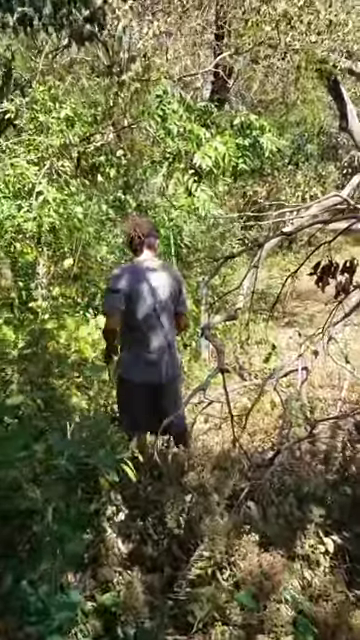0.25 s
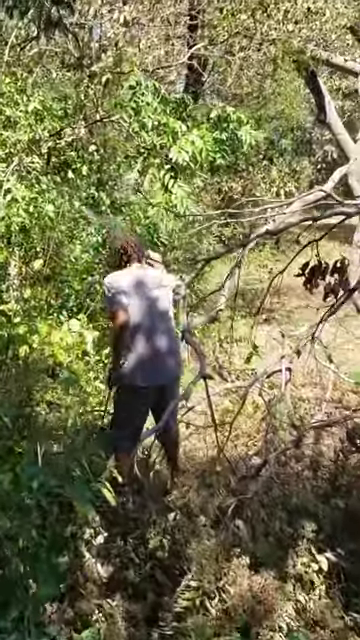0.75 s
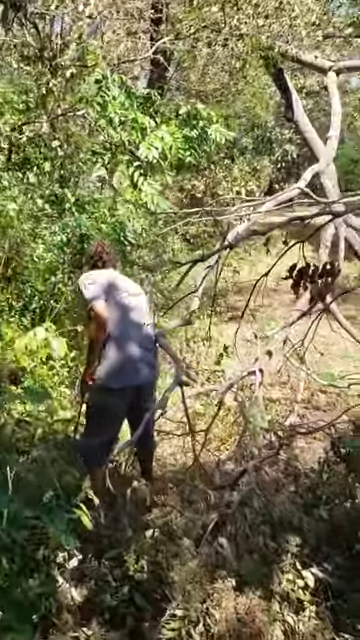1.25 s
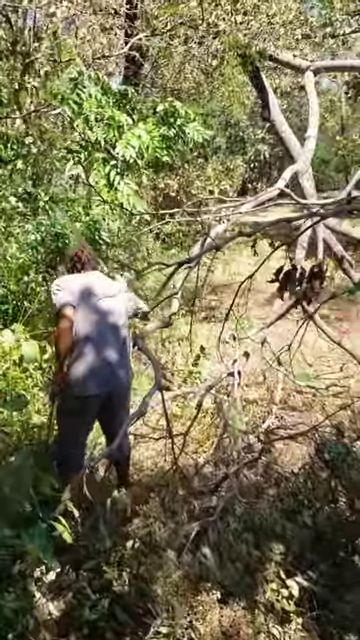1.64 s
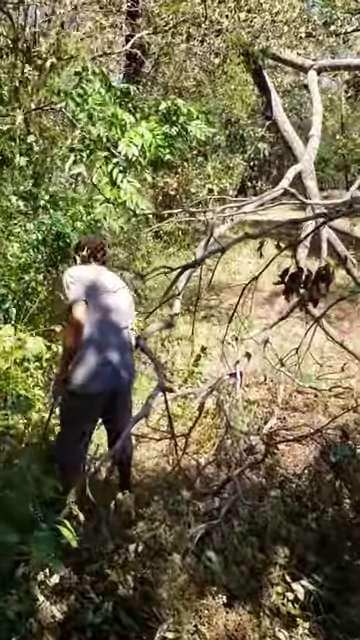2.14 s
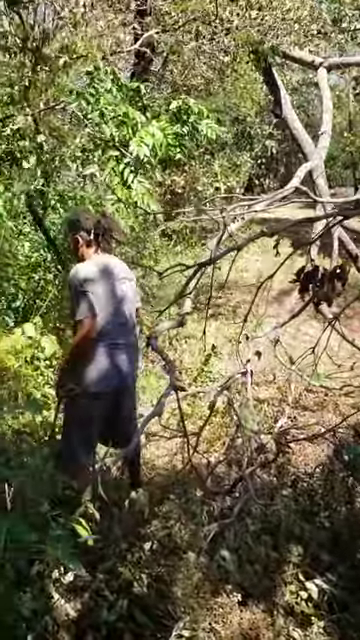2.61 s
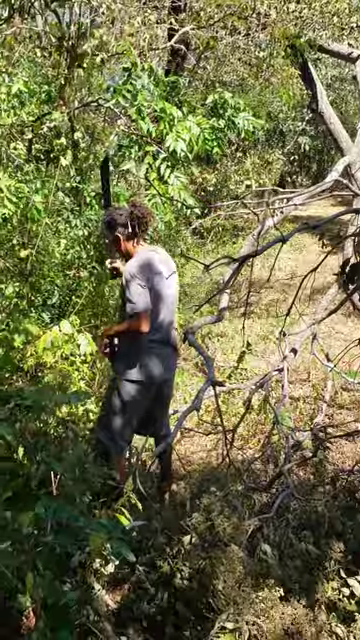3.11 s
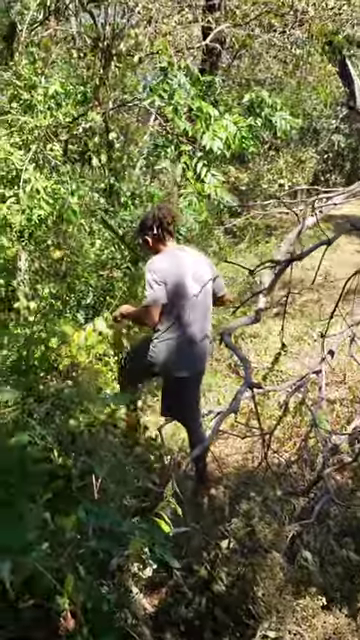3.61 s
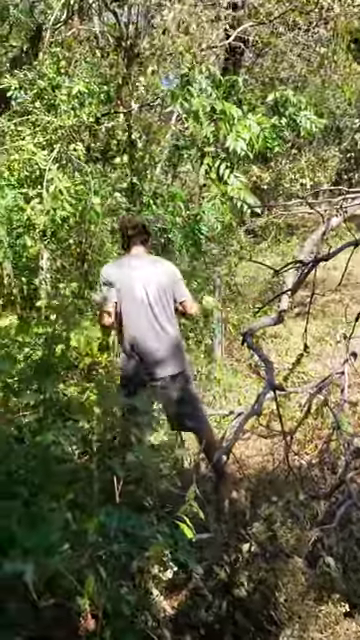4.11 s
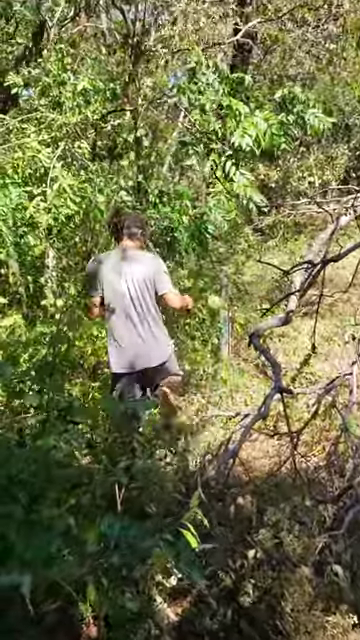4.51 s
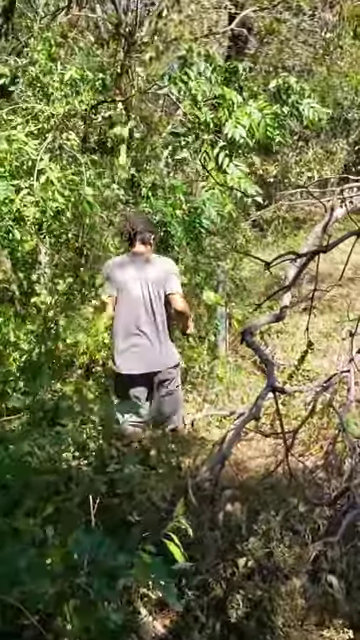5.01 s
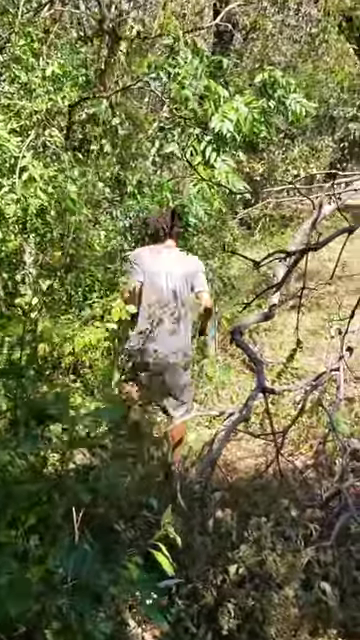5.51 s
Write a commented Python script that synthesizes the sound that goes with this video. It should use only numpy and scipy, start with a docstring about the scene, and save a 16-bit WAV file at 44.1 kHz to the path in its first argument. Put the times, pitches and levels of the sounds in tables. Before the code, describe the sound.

Dry leaves crackle and twigs snap underfoot while a long blade chops brush twice, ringing metallically after the second blow.

```python
"""On dry brushland, someone clears a way with a long blade, heard by a walker following on two ports.
Leaves crackle underfoot and around the cutter: noise gated by random cracks, over swells for each step.
Twigs snap as short noise pulses with a decaying ring; two chops thrash the bush and ring the blade's modes.
Sound from below reaches the right port well before the left; wind thumps are low tones on single ports."""
import sys
import numpy as np
from scipy import signal
from scipy.fft import rfft, irfft, next_fast_len
from scipy.io import wavfile

SR = 44100
rng = np.random.default_rng(int(sys.argv[2]) if len(sys.argv) > 2 else 0)


def wav_out(sig):
    """Save sig, one row per channel (or a flat mono array), as 16-bit PCM at SR to the path in sys.argv[1]."""
    wavfile.write(sys.argv[1], SR, np.round(np.clip(np.atleast_2d(sig).T, -1, 1) * 32767).astype(np.int16))


N = 253575
T = np.arange(N) / SR  # time axis, s
SIZE = next_fast_len(N + 4096)  # transform length, samples
HZ = np.maximum(np.arange(SIZE // 2 + 1) * SR / SIZE, 1)


def undb(db):
    """Level to amplitude: 20 dB is a factor of ten."""
    return 10 ** (np.asarray(db) / 20)


def over_hz(table, column=1):
    """Logarithmic frequency scale: a table column interpolated straight on a log axis."""
    table = np.array(table, float)
    return np.interp(np.log(HZ), np.log(table[:, 0]), table[:, column])


def band_noise(order, edges_hz, shape):
    """Band-limited noise: a Butterworth band-pass shapes white noise."""
    sos = signal.butter(order, edges_hz, "band", fs=SR, output="sos")
    return signal.sosfilt(sos, rng.standard_normal(shape))


# Wind thumps: (time [s], peak level [dB], rise [s], frequency [Hz], port [0 left, 1 right])
PUFFS = [(.28, -48.5, 0.018, 70, 1), (.32, -51, 0.041, 55.2, 0), (1.33, -44, 0.012, 70.4, 1),
         (1.7, -54.5, 0.0336, 60.2, 1), (2.2, -42, 0.0096, 68.4, 1), (2.27, -46, 0.015, 35, 1),
         (2.3, -58, 0.014, 55, 0), (2.47, -49, .03, 54, 1), (3.27, -51, 0.0057, 50, 0),
         (5.7, -45, 0.013, 69.8, 1)]
RUMBLE_DB, AIR_DB = -70.5, -66


def wind():
    """Uncorrelated pressure at each port: low rumble and short thumps, over a faint shared hum of air."""
    rumble = band_noise(3, [45, 95], (2, N))
    rumble = rumble / rumble.std()
    out = undb(RUMBLE_DB) * rumble
    for s, db, rise, hz, port in PUFFS:
        width = np.where(T < s, rise, 1.66 * rise)  # falls more slowly than it rises
        size = undb(db) * np.exp(-.5 * ((T - s) / width) ** 2)
        phase = 2 * np.pi * (hz * T + rng.random()) + 0.399 * rumble[0]
        out[int(port > .5)] += size * np.sin(phase)
    air = band_noise(1, [60, 500], N)
    return out + undb(AIR_DB) * air / air.std()


def ring(modes, at, db, free, sink=0):
    """Modal decay of a struck body: random start phases; the pitch may sink by a share each second."""
    t = np.maximum(T - at, 0)
    bent = t - sink * t ** 2 / 2
    tones = 0
    for hz, mode_db, t60 in modes:
        decay = np.exp(-np.log(1000) * t / (t60 * free))
        tones = tones + undb(mode_db) * decay * np.sin(2 * np.pi * (hz * bent + rng.random()))
    onset = 1 - np.exp(-t / 0.0061)
    return undb(db) * tones * onset


# Modes of the shaken stems and ground: (frequency [Hz], level against the blow [dB], full t60 [s])
THUD = [(75.8, -6, 0.48), (120.6, -1.5, 0.26), (232, -2.5, 0.25), (549, -3.5, 0.22)]
# Chops and heavy footfalls: (time [s], level [dB], share of the full t60 [0-1])
THUDS = [(.185, -40, 0.18), (.89, -55, 0.11), (1.005, -36, 0.83), (1.904, -38, 1), (3.086, -39, 0.17),
         (3.403, -53.5, 0.25), (3.635, -47.5, 0.3366), (3.735, -39, 0.14), (3.903, -47, 0.55)]


def thuds():
    """Low-frequency modal response: chops and heavy footfalls shake stems and ground."""
    return sum(ring(THUD, *row) for row in THUDS)


# Chops: (time [s], bush level [dB], blade level [dB], share of the blade's free t60 [0-1])
CHOPS = [(1.004, -17.5, -38, 0.25), (1.903, -17.5, -43.5, 1.0)]
# Blade modes, one close pair of which beats: (frequency [Hz], level against the blow [dB], free t60 [s])
BLADE = [(2748, -11, 6), (3424, -6, .3), (3881, -5, .3), (4150, -4, .9), (4178, 1, 1.25), (5297, -4, .3),
         (5890, -4, .3), (6270, -4, .3)]
QUIVER_HZ, QUIVER_DB = 8.5, 2  # the struck blade flexes and its ring wavers
LAG_BLADE = 2 / SR  # left port after right, s


def blade():
    """Modal ringing with directivity: the struck blade swings away and turns, facing either port in turn."""
    tone = sum(ring(BLADE, s, db, free, sink=.008) for s, _, db, free in CHOPS)
    tone = tone * undb(QUIVER_DB * np.sin(2 * np.pi * QUIVER_HZ * T))
    turn_db = 3 * np.sin(2 * np.pi * (T - 2.2) / .75)
    tone = tone * np.clip((2.92 - T) / .12, 0, 1)  # the ring is stopped short, fading out from 2.80 to 2.92 s
    # seen edge-on, its ring reaches the ports closer together than the brush it cuts
    left = np.roll(tone, round(LAG_BLADE * SR))
    return undb([turn_db, -turn_db]) * np.array([left, tone])


# Steps and pushes through the brush, each a swell of rustle: (peak time [s], leaves level [dB],
# rise [dB/s], fall [dB/s], twigs against leaves [dB], tread against leaves [dB], share underfoot [0-1])
STEPS = [(.005, -50, 100, 250, -6, -14, 0.68), (.08, -41.5, 248, 53, -8.5, -21, 0.51),
         (.165, -33.5, 248, 61, -7, -20, 0.49), (0.288, -39, 76, 87, -4, -30, .58),
         (.45, -45.5, 60, 47, -8.5, -15, 0.49), (.67, -54.5, 200, 73, -7.5, -7, 0.5),
         (.738, -46, 1500, 410, -11, -18, 0.56), (.77, -43.5, 1000, 200, -10, -16, 0.54),
         (.84, -50, 400, 52, -14, -15, 0.63), (.922, -31.5, 216, 157, -1.5, -20.5, .9),
         (1.12, -38.5, 100, 110, -2.5, -15.5, 0.92), (1.19, -37, 60, 200, -8.5, -30, 1),
         (1.34, -41, 50.4, 67, -5.5, -20.5, 1), (1.46, -39, 40, 170, -3.5, -21.5, 0.92),
         (1.592, -33.5, 514, 140, -4, -31, 0.92), (1.628, -24, 270, 425, -4.5, -25.5, 1),
         (1.68, -51, 400, 260, -15, -11, 0.7), (1.86, -60.5, 40, 280, -11, -23, 0.46),
         (2.4, -52, 40, 50, -4.5, -20, 0.03), (2.573, -43.5, 100, 110, -6, -22, .1),
         (2.811, -49.5, 2000, 130, -7, -16, 0.15), (2.953, -48, 2000, 22, -11, -32, 0.07),
         (3.02, -40, 1500, 500, -10, -25, 0.09), (3.04, -37.5, 1200, 180, -8.5, -21.5, 0.2),
         (3.099, -36, 800, 150, -6.5, -21.5, 0.81), (3.23, -43, 59, 43, -4.5, -21.5, 0.31),
         (3.386, -38.5, 220, 240, -10.5, -31, 0.017), (3.48, -55, 50, 100, -13.5, -30, 0.03),
         (3.545, -45, 700, 320, -9.5, -33, 0.1), (3.644, -43, 890, 39, -6, -18, 0.017),
         (3.745, -33.5, 251, 130, -8, -29, 0.017), (3.83, -37.5, 120, 22.3, -6.5, -20.5, 0.021),
         (4.19, -45, 300, 71, -1.5, -27, 1), (4.31, -42.5, 39.4, 160, -4, -17, 0.97),
         (4.55, -42, 61.6, 55, -2, -18, 1), (4.65, -39.5, 1300, 86, -2.5, -24, 0.99),
         (4.72, -38, 128, 107, -3.5, -20, .9), (4.81, -41.5, 150, 43, -4, -20, 0.85),
         (5.026, -36.5, 170, 230, -3.5, -21, 0.86), (5.07, -40, 200, 180, -6.5, -17.5, 0.57),
         (5.16, -42, 170, 104, -4, -22, 0.42), (5.33, -38.5, 109, 33, -15, -26, 0.42),
         (5.448, -31.5, 94, 165, -3.5, -22, 0.61), (5.6, -46.5, 60, 56, -3.5, -15.5, 0.16),
         (5.69, -44, 200, 22, -6.5, -32, .1)]
# Each chop thrashes the bush, which then settles: (level against the blow [dB], fall [dB/s],
# twigs against leaves [dB], tread against leaves [dB])
THRASH = [(-1, 239, -3, -18), (-18.5, 45, -3, -18.5)]
# The brush at rest, both directions together: level [dB] of tread, stems, twigs, leaves
STIR_DB = [-73.5, -86.5, -67.5, -60.5]
THRASH_RISE_DB_S = 7000
ROUND_DB = 0.5  # rounds the top of a swell
STEMS_DB = -8.5  # against the twigs


def rustle():
    """Addition of powers: swells of steps and chops over a faint stir.

    Gives power by direction (below, ahead) and band (tread, stems, twigs, leaves)."""
    chops = [(s, db + rel_db, THRASH_RISE_DB_S, *rest, .15)
             for s, db, *_ in CHOPS for rel_db, *rest in THRASH]
    power = np.ones((2, 4, N)) * undb(2 * np.array(STIR_DB))[:, None] / 2
    for s, db, rise_db, fall_db, twigs_db, tread_db, underfoot in STEPS + chops:
        down_db = np.where(T < s, (s - T) * rise_db, (T - s) * fall_db)
        swell = undb(2 * (db + ROUND_DB - np.hypot(down_db, ROUND_DB)))  # doubled dB: power
        colour = undb(2 * np.array([tread_db, twigs_db + STEMS_DB, twigs_db, 0]))
        share = np.clip(underfoot, 0, 1)
        power += np.array([share, 1 - share])[:, None, None] * colour[:, None] * swell
    return power


# Edges of the tread, stems, twigs and leaves bands: frequency [Hz]
BAND_HZ = [120, 800, 2500, 7000, 17000]
# Colour of the litter: (frequency [Hz], relative level [dB])
LITTER = [(100, -10.5), (350, -9.5), (600, -4.5), (1500, -3), (2500, 0), (4000, 1), (5500, 0.5),
          (6900, -1.5), (9000, 1), (11000, 2.5), (16000, 1.5)]


def band(k):
    """Power-complementary crossover: litter colour between two edges; unit noise gives unit rms."""
    lower, upper = [np.clip(np.log2(HZ / f) / 0.63 + .5, 0, 1) for f in BAND_HZ[k:k + 2]]
    shape = np.sqrt(np.maximum(lower - upper, 0)) * undb(over_hz(LITTER))
    return shape / np.sqrt(np.mean(shape ** 2))


def grains(rate, spread_db, t60):
    """Shot process: power, mean near 1, of random cracks with sudden start, quick decay and some larger."""
    size = undb(2 * np.minimum(spread_db * rng.exponential(size=N), 3.0 * spread_db))
    kicks = (rng.random(N) < rate / SR) * size / size.mean() * SR / rate
    keep = np.exp(-2 * np.log(1000) / (t60 * SR))
    return signal.lfilter([1 - keep], [1, -keep], kicks)


# Snaps: (time [s], peak level [dB], twig ring [Hz], mean twigs level against peak [dB],
# mean stems level against peak [dB])
SNAPS = [(0.0518, -39, 6156, -20, -24), (0.0679, -25, 6500, -20, -24), (0.0807, -24, 6440, -21, -34),
         (0.1206, -26, 3520, -17.5, -35), (0.1426, -32, 3870, -19, -32), (0.157, -8, 6240, -22, -43),
         (0.2345, -24, 3540, -19, -17.5), (0.2904, -21, 2270, -15.5, -23), (0.4344, -28, 4303, -21, -29),
         (0.4884, -27.5, 3440, -17, -18), (0.5226, -36, 5050, -29, -31), (0.5653, -34, 6010, -14, -22),
         (0.5993, -24.5, 6560, -17.5, -29), (0.6522, -34.5, 3800, -14, -16), (0.6682, -28, 2470, -27, -13),
         (0.7234, -30, 4100, -17, -33), (0.739, -22.5, 4360, -24, -25.5), (0.7652, -24, 5645, -30, -28),
         (0.8338, -33, 3820, -16, -31), (0.871, -33, 4020, -9, -28), (0.8928, -19, 6000, -15, -26),
         (1.0025, -9.5, 5620, -10, -13), (1.1282, -16.5, 3550, -15, -24), (1.1975, -17.5, 3700, -24, -24),
         (1.27, -28, 5790, -20, -22), (1.317, -24.5, 4100, -13.5, -35), (1.334, -26, 3420, -22.5, -29),
         (1.3865, -22, 6120, -14, -22), (1.4474, -27, 5500, -23, -24), (1.564, -37, 4500, -28, -39),
         (1.5765, -19, 3770, -18, -32), (1.9016, -4, 6000, -17, -37), (2.5212, -35, 2780, -16, -10),
         (2.585, -23, 5460, -12, -41), (2.691, -34.5, 4530, -11, -36), (2.812, -37, 2732, -17, -32),
         (2.9522, -39.5, 5910, -18, -36), (3.0016, -34, 6560, -17, -35), (3.0186, -19.5, 5700, -22.5, -30),
         (3.037, -14.5, 5300, -28, -33), (3.0886, -16, 6162, -25, -25.5), (3.1591, -27, 4060, -18, -13.5),
         (3.1926, -22.5, 5700, -16, -23), (3.2206, -26, 6090, -20, -32), (3.2296, -24.5, 4000, -17, -38),
         (3.3754, -28.5, 6050, -14, -32), (3.4396, -42, 6320, -23, -34), (3.4987, -28, 5940, -13.5, -20),
         (3.5428, -30, 5750, -20, -28), (3.5883, -29, 4660, -17.5, -37.5),
         (3.6446, -25.5, 6420, -15.5, -20.5), (3.7332, -5, 5800, -22, -44),
         (4.2198, -26.5, 3850, -15, -15.5), (4.2408, -30, 3880, -14, -22), (4.267, -26, 2350, -11, -15),
         (4.2806, -25.5, 3989, -11, -24), (4.3022, -23.5, 4000, -10, -20),
         (4.3369, -23.5, 6130, -13.5, -22), (4.4062, -26.5, 5850, -12.5, -25),
         (4.441, -29.5, 3710, -17, -15.5), (4.469, -30, 1880, -21, -15), (4.4854, -35, 6930, -22, -23),
         (4.4988, -28.5, 5570, -17, -27), (4.5108, -26, 4900, -15, -21), (4.5467, -23, 6000, -16, -21),
         (4.602, -21.5, 4100, -23, -25), (4.646, -19, 3500, -15.5, -22), (4.6594, -23.5, 4000, -10.5, -22),
         (4.7135, -22.5, 6000, -10.5, -25), (4.7992, -23.5, 4135, -15, -23),
         (4.8523, -22.5, 5800, -13, -19.5), (4.873, -22.5, 6300, -16, -27.5),
         (4.9028, -23.5, 6260, -19, -26), (4.9444, -29, 4400, -11, -29), (4.9521, -26.5, 3750, -18, -24),
         (5.012, -23, 3560, -14, -23), (5.0202, -21.5, 3740, -11.5, -24), (5.0293, -19, 3600, -14, -24),
         (5.095, -32, 5540, -27, -30), (5.3098, -24, 6340, -15, -26)]
SNAP_LEAVES_DB, SNAP_TREAD_DB = -11, -37.5  # mean level against the peak, alike for all snaps
CREST_DB = 2  # top of a crack over its mean level
CRACK_S = 0.0005  # time to the peak, before each band's stretch
SNAP_N = 3000  # samples kept of each snap


def snaps(power, below):
    """Brittle fracture: size envelopes by band and each twig's short ring, for one direction.

    A snap belongs to whoever's leaves are louder at that moment."""
    size, twig, t = np.zeros((4, N + SNAP_N)), np.zeros(N + SNAP_N), T[:SNAP_N]
    # the crack runs through the wood, long waves take longer; splinters rattle on after it
    run = t / (CRACK_S * np.array([[3.], [1.5], [1.1], [.9]]))
    rattle = 0.096 * (1 - np.exp(-run)) * np.exp(-run / 34.0)
    shape = run * np.exp(1 - run) + rattle
    for s, db, hz, twigs_db, stems_db in SNAPS:
        i = int(s * SR)
        feet_louder = power[0, 3, i] > power[1, 3, i]
        if feet_louder == below:
            bands_db = np.array([SNAP_TREAD_DB, stems_db, twigs_db, SNAP_LEAVES_DB])
            size[:, i:i + SNAP_N] += undb(db + CREST_DB + bands_db)[:, None] * shape
            ring_size = undb(db + max(twigs_db, stems_db) - 2.5) * shape[0]
            twig[i:i + SNAP_N] += ring_size * np.sin(2 * np.pi * hz * t)
    return size[:, :N], twig[:N]


def brush(power, below, base_rate, crack_share):
    """Superposed fractures: a hiss of tiny cracks in leaves and twigs, with larger ones on top.

    Gives spectra (direct, scattered left, scattered right); base_rate is in cracks per second."""
    # harder treading breaks more leaves at once, so loud rustle is denser
    rate = base_rate * (power[:, 3].sum(axis=0) / undb(2 * -41.5)) ** 0.2
    common = grains(rate, spread_db=4.0, t60=.005)  # crisp ticks over all bands
    size, twig = snaps(power, below)
    splinters = np.sign(rng.standard_normal((3, N)))
    out = rfft(twig, SIZE) * np.array([[1.3], [0], [0]])  # a twig rings from one spot, unscattered
    for k in range(4):
        own = grains(3 * rate, spread_db=12.0, t60=0.021)
        crackle = 1 - crack_share + crack_share * (common + own) / 2
        hiss_power = np.maximum(power[0 if below else 1, k] * crackle, 0)
        hiss = np.sqrt(hiss_power) * rng.standard_normal((3, N))
        out = out + band(k) * rfft(hiss + size[k] * splinters, SIZE)
    return out


# Right port against the left: (frequency [Hz], from below [dB], from ahead [dB])
RIGHT_PORT = [(100, 2.5, 9), (1470, 3.5, -2), (3060, 0.5, 1.5), (3640, 5.5, -2), (5940, 3, 6.5),
              (6650, 7.5, 4.5), (7120, -14, -3), (8200, 3.5, 1.5), (9500, -2, 4), (10620, 7.5, 4),
              (12500, 3, 2), (13844, 6.5, -1), (15500, 12, 3), (15630, 20, 13)]
# Power arriving scattered, unrelated on the ports: (frequency [Hz], below [share 0-1], ahead [share 0-1])
SCATTER = [(196, 0.0644, 0.042), (1020, 0.061, 0.74), (2870, 0.094, 0.12), (5219, 0.52, 0.75),
           (11500, 0.72, 1)]


def ports(direct, scattered, column, lag_s):
    """Interaural-like cues for one direction: left lag, right port's colour and partial coherence."""
    share = np.clip(over_hz(SCATTER, column), 0, 1)
    common = np.sqrt(1 - share) * direct
    left = common * np.exp(-2j * np.pi * HZ * lag_s) + np.sqrt(share) * scattered[0]
    right = common + np.sqrt(share) * scattered[1]
    right = right * undb(over_hz(RIGHT_PORT, column))
    return irfft(np.array([left, right]), SIZE)[:, :N]


# how much later the left port hears the feet, the brush being chopped, and the cutter wading on (s)
LAG_BELOW, LAG_CHOPPING, LAG_WADING = 22 / SR, 5.5 / SR, 7.7 / SR
WADING_FROM_S = 2.2


def scene():
    """Linear superposition of wind, thuds, blade and the brush below and ahead."""
    power = rustle()
    feet = brush(power, True, base_rate=150., crack_share=0.41)
    cutter = brush(power, False, base_rate=120., crack_share=0.2)
    below = ports(feet[0], feet[1:], column=1, lag_s=LAG_BELOW)
    chopping = ports(cutter[0], cutter[1:], column=2, lag_s=LAG_CHOPPING)
    wading = ports(cutter[0], cutter[1:], column=2, lag_s=LAG_WADING)
    ahead = np.where(T < WADING_FROM_S, chopping, wading)
    return wind() + thuds() + blade() + below + ahead


TOP_HZ = 15800


def record(dry):
    """Band limitation: a steep elliptic low-pass cuts the top."""
    return signal.sosfilt(signal.ellip(12, .3, 80, TOP_HZ, fs=SR, output="sos"), dry)


dry = scene()
out = record(dry)
wav_out(out)
```